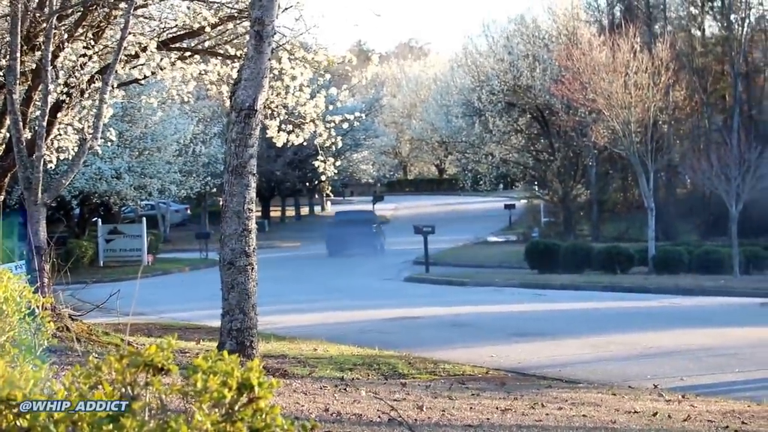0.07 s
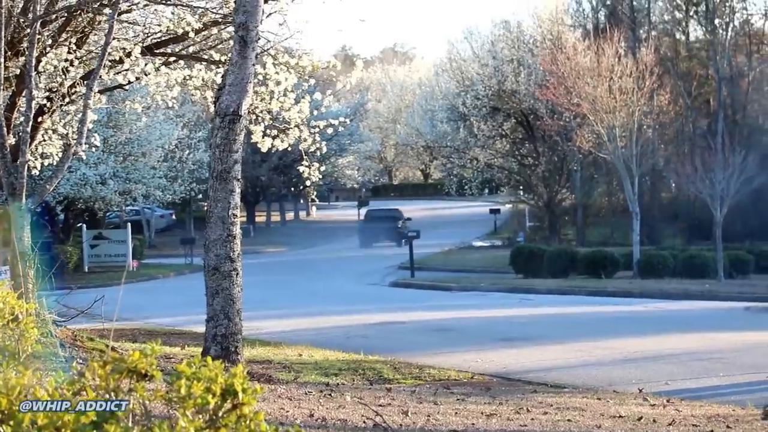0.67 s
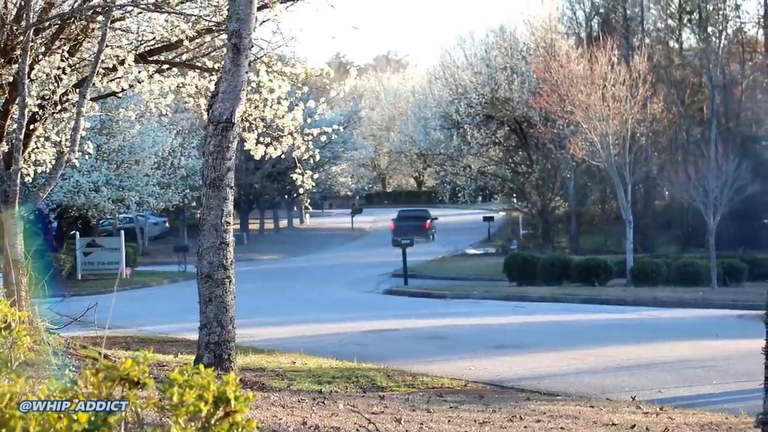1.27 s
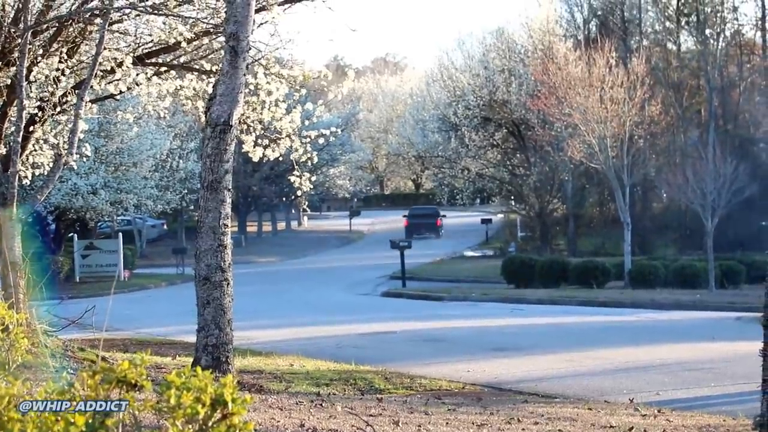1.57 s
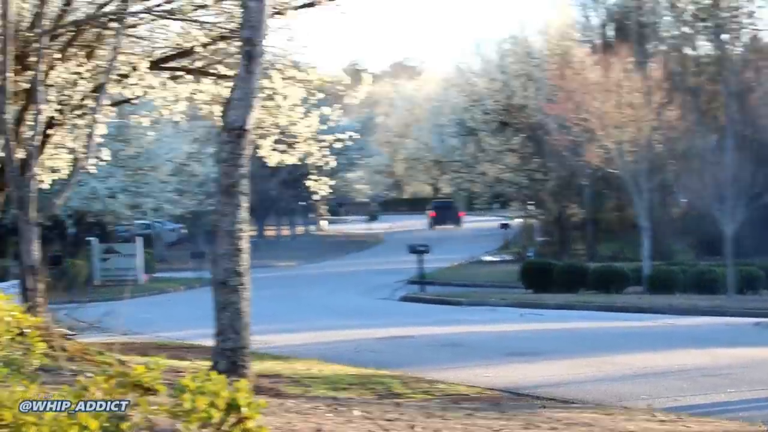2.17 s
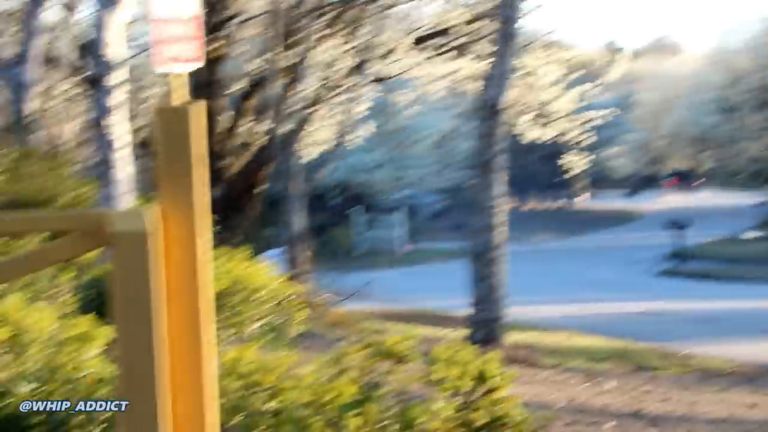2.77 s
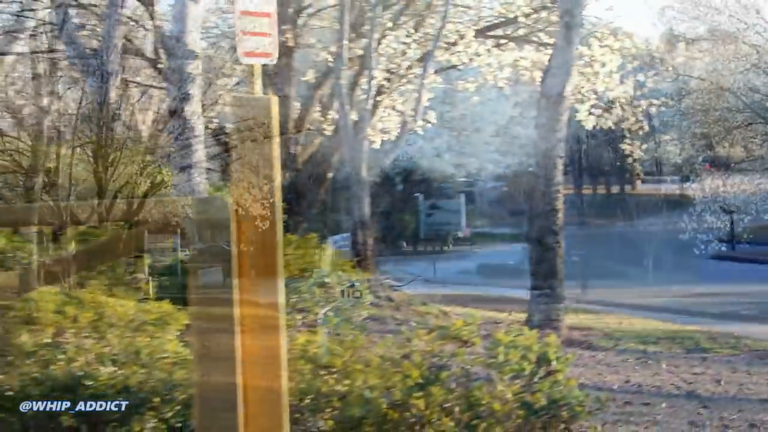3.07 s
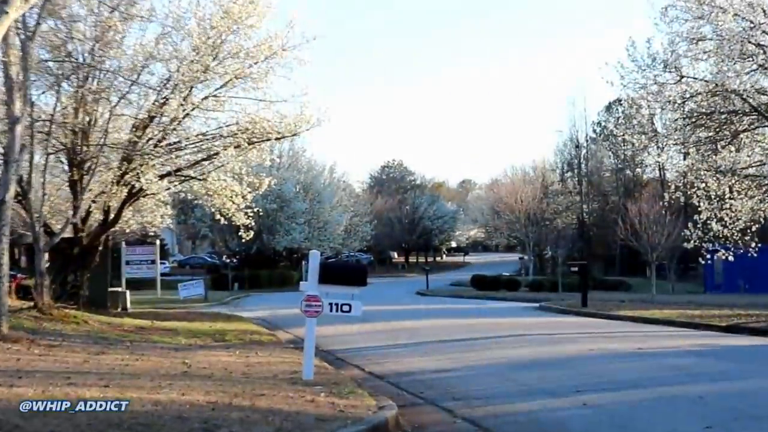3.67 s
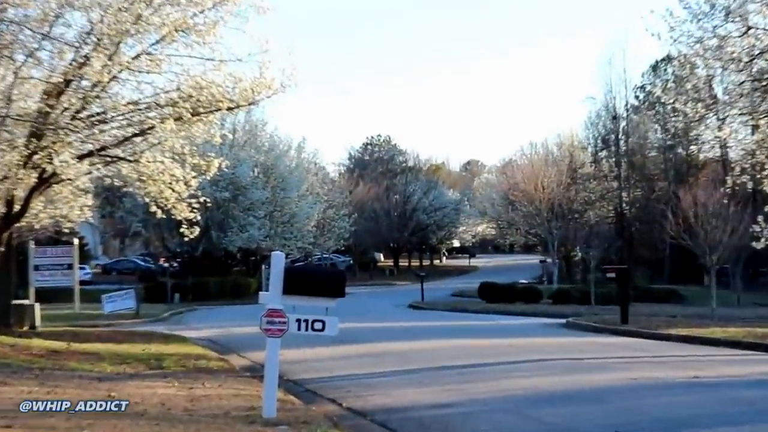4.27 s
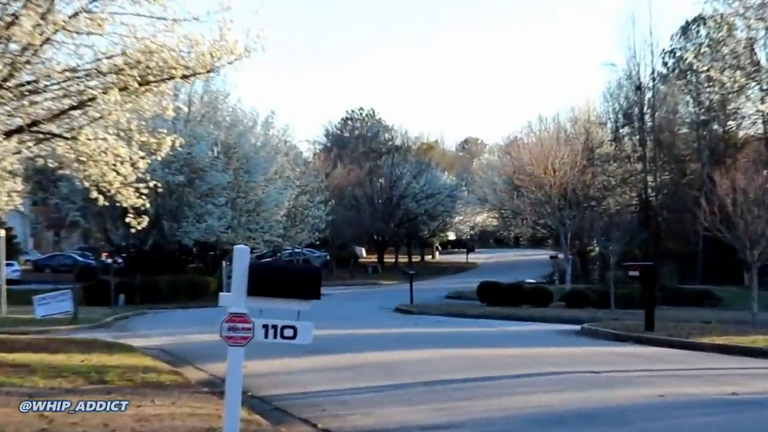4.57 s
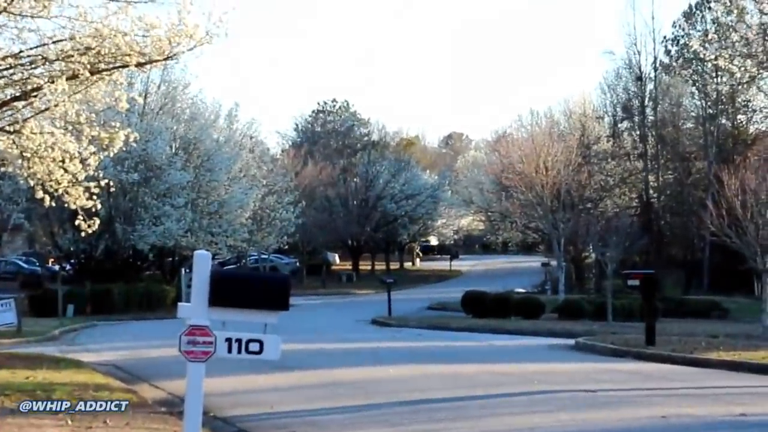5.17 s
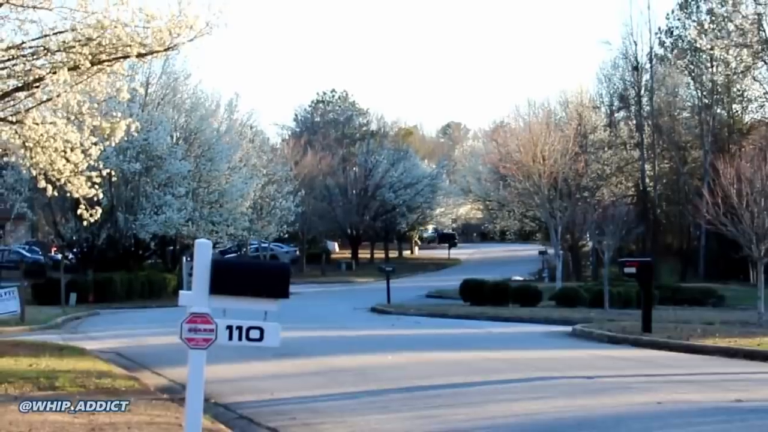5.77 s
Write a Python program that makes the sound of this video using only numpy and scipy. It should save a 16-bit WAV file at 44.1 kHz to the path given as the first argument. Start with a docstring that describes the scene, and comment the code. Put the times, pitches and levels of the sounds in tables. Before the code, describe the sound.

A V8 truck pulls away and fades under gusting wind and snapping twigs, then, in calm air, rumbles softly nearer from far off.

```python
"""A V8 truck pulls away down a street, rasping under load, then eases off and burbles into the distance.
As it goes, a gust rises: it buffets the microphone, roars in the trees and rustles the leaves,
and dry twigs snap. Just after three seconds, a hard cut to calm air and a murmur of traffic.
The truck, far off, rolls slowly nearer just above idle, its exhaust fluttering; one last twig snaps."""
import sys
import numpy as np
from scipy import signal
from scipy.fft import rfft, irfft, next_fast_len
from scipy.io import wavfile
from scipy.ndimage import uniform_filter1d, map_coordinates

SR = 44100
rng = np.random.default_rng(int(sys.argv[2]) if len(sys.argv) > 2 else 0)


def dump(signal):
    """Clip the signal to [-1, 1] and save it as 16-bit WAV at the path in sys.argv[1]."""
    limited = np.clip(np.atleast_2d(signal).T, -1, 1)
    pcm = np.round(limited * 32767).astype(np.int16)
    wavfile.write(sys.argv[1], SR, pcm)


N = 256662
T = np.arange(N) / SR
CUT_S = 3.142  # windy departure before, calm return after


# Throttle moves; voice 0 is pulling, 1 easing, 2 rolling, 3 cruising: start_s, cycle_hz, lag_s, voice
THROTTLE_MOVES = [(0, 42.5, .05, 0), (.27, 43.2, .03, 0), (.465, 30.7, .057, 1), (.87, 26.9, .035, 2),
                  (1.15, 25.4, .045, 2), (1.35, 28.4, .037, 2), (1.6, 22.5, .033, 3), (2.9, 20.6, .07, 3)]
def engine():
    """Cycle rate, voice and roughness: the engine lags behind the throttle and stumbles at each lift."""
    last_hz, last_voice = 42.05, 0
    cycle_hz, voice, lifts = np.full(N, last_hz), np.zeros(N), np.zeros(N)
    for start_s, hz, lag_s, new_voice in THROTTLE_MOVES:
        cycle_hz += (hz - last_hz) * settle(start_s, lag_s)
        voice += (new_voice - last_voice) * settle(start_s, lag_s)
        age = since(start_s) / 0.075  # the stumble peaks 75 ms after the lift
        lifts += (new_voice - last_voice) * age * np.exp(1 - age)
        last_hz, last_voice = hz, new_voice
    roughness = 0.037 + 0.048 * voice + 0.32 * lifts
    return cycle_hz, voice, roughness


# The exhaust's four voices, as harmonics of the cycle rate: order, relative_db
PULLING_ORDERS = [(1, -44.5), (2, -7), (3, -11), (4, -8), (5, 1), (6, -1.5), (7, 1.5), (8, -2), (9, -3),
                  (10, -1.5), (11, -14.5), (12, -17), (13, -16.5), (14, -19), (15, -10), (16, -15),
                  (17, -15.5), (18, -14.5), (19, -7.5), (20, -16), (21, -9.5), (22, -22), (23, -15.5),
                  (24, -11.5), (25, -31.5), (26, -8), (27, -15), (28, -12), (29, -25), (30, -14),
                  (31, -16.5), (32, -21), (33, -27), (34, -41), (35, -14), (36, -36), (37, -34.5),
                  (38, -24), (39, -17.5), (40, -21.5)]
EASING_ORDERS = [(1, -40), (2, -34), (3, -16), (4, -24), (5, -12), (6, -12.5), (7, -14), (8, 1.5), (9, -19),
                 (10, -11.5), (11, -11), (12, -19.5), (13, -30), (14, -22), (15, -19), (16, -21.5),
                 (17, -28), (18, -21), (19, -33), (20, -37), (21, -42), (22, -28), (23, -41), (24, -30),
                 (25, -34), (26, -18.5), (27, -38), (28, -29)]
ROLLING_ORDERS = [(1, -20), (2, -29), (3, -27), (4, -13), (5, -1), (6, -28), (7, -9.5), (8, 3), (9, -15),
                  (10, -12), (11, -13.5), (12, -10.5), (13, -24), (14, -22.5)]
CRUISING_ORDERS = [(1, -26), (2, -21), (3, -23.5), (4, -10), (5, 8), (6, -27.5), (7, 0.5), (8, -11),
                   (9, -2), (10, -7.5), (11, -14), (12, -22), (13, -5.5), (14, -17)]
# Tone of the breathy rasp and of its hard buzz: freq_hz, gain_db
RASP_EQ = [(25, -33), (55, -22), (75, -3), (110, 6), (260, 14.5), (420, 10.5), (560, -12.5), (1000, 7),
           (1600, 2.5), (2200, -1), (3000, 0.5), (4000, -10.5), (6000, -22.5), (8000, -37.5), (14000, -78)]
BUZZ_EQ = [(700, -48), (1000, -14), (1700, 5.5), (2400, -0.5), (3000, -7.5), (4000, -12.5), (6000, -24),
           (9000, -45), (14000, -72)]
# The exhaust booms up: peak_s, note_gain_db, rasp_gain_db, half_length_s
EXHAUST_BOOMS = [(.4, 1, 1, 0.032), (0.623, 3, 0.5, .03), (.815, 8.5, 5, 0.051), (1.402, 7, -9, .11),
                 (2.35, 4.5, 2, 0.086), (2.86, 6, -1, .12)]
def exhaust_leaving(lift_off_s=0.38):
    """Off the throttle the note drops and turns rough, the rasp dies, and distance fades the rest."""
    cycle_hz, voice, roughness = engine()
    boom_db, bark_db = swells(EXHAUST_BOOMS)
    note_db = -16.5 - 8 * settle(lift_off_s, lag_s=0.17) - 0.5 * T + boom_db
    rasp_db = -25.5 - 22 * since(lift_off_s) + bark_db
    stumble = 0.0595 * roughness * wander(rate_hz=28)
    cycles = np.cumsum(cycle_hz) / SR + stumble
    voices = [PULLING_ORDERS, EASING_ORDERS, ROLLING_ORDERS, CRUISING_ORDERS]
    note = exhaust_note(cycles, voices, voice, roughness, flicker_hz=23.97)
    rasp = noise(RASP_EQ, patchy_db=1.5) * puffs(cycles, depth=0.23, lope=0.047)
    # part of the rasp repeats with every engine cycle: a hard buzz
    grain = rng.standard_normal(1024)
    buzz = colour(np.interp(cycles, np.arange(1024) / 1024, grain, period=1), BUZZ_EQ)
    return from_db(note_db) * note + from_db(rasp_db) * (rasp + from_db(-3) * buzz)


# The exhaust's voice near idle: order, relative_db
IDLE_ORDERS = [(1, -35), (2, -35), (3, -37), (4, -34), (5, -7), (6, -13), (7, -40), (8, 1.5), (9, -7),
               (10, -7.5), (11, -13), (12, -12.5), (13, -7.5), (14, -12), (15, -13), (16, -15.5), (17, -21),
               (18, -23), (19, -15), (20, -14.5), (21, -18.5), (22, -19.5), (23, -18.5), (24, -28),
               (25, -44), (26, -15.5), (27, -29), (28, -45)]
# Tone of the idling note, light in the bass, and of the gas flutter: freq_hz, gain_db
IDLE_NOTE_EQ = [(50, -18), (85, -12.5), (125, -2), (215, 2), (500, -7)]
FLUTTER_EQ = [(20, -44), (70, -19), (140, 4), (220, 3), (320, 1.5), (470, 1), (650, -6.5), (1200, -19),
              (3000, -60)]
def exhaust_returning(start_hz=18.05, idle_hz=16.68, settle_s=0.39):
    """A loping note sinks toward idle; it and the flutter of exhaust gas grow as the truck nears."""
    cycle_hz = idle_hz + (start_hz - idle_hz) * np.exp(-since(CUT_S) / settle_s)
    cycles = np.cumsum(cycle_hz) / SR
    nearness = settle(start_s=4.01, lag_s=0.39)
    note_db = np.interp(nearness, [0, 1], [-34.5, -24])
    flutter_db = np.interp(nearness, [0, 1], [-49, -33])
    note = exhaust_note(cycles, [IDLE_ORDERS], np.zeros(N), roughness=0.15, flicker_hz=7)
    flutter = noise(FLUTTER_EQ, patchy_db=0.8) * puffs(cycles, depth=0.092, lope=0.1)
    return from_db(note_db) * colour(note, IDLE_NOTE_EQ) + from_db(flutter_db) * flutter


def exhaust_note(cycles, voices, voice, roughness, flicker_hz):
    """Engine orders, crossfaded between voices; each flickers as firings vary and echoes shift."""
    note, slots = np.zeros(N), np.arange(len(voices))
    for order in range(1, max(map(len, voices)) + 1):
        gains = [from_db(rows[order - 1][1]) if order <= len(rows) else 0 for rows in voices]
        flicker, jitter = roughness * wander(flicker_hz), roughness * wander(flicker_hz)
        phase = 2 * np.pi * (order * cycles + rng.random())
        partial = (1 + flicker) * np.cos(phase) + jitter * np.sin(phase)
        note += np.interp(voice, slots, gains) * partial
    voice_rms = [np.sqrt(sum(from_db(db) ** 2 for _, db in rows) / 2) for rows in voices]
    return note / np.interp(voice, slots, voice_rms) / np.sqrt(1 + 2 * roughness ** 2)


def puffs(cycles, depth, lope):
    """Gas leaves the pipe in eight puffs a cycle, with one bank stronger than the other."""
    phase = 2 * np.pi * cycles
    return unit(np.exp(depth * np.cos(8 * phase) + lope * np.cos(phase)))


# Midrange roar of rubber on the road: freq_hz, gain_db
TYRE_EQ = [(200, -22.5), (500, 4.5), (800, 5), (1200, 5), (1800, -2.5), (2800, -30), (5000, -44),
           (10000, -53.5)]
def tyres_leaving(roll_start_s=0.5):
    """The last of the wheelspin, then a rolling roar that comes up and recedes."""
    spin = from_db(-22.5 - 91.5 * T)
    roll = settle(roll_start_s, lag_s=0.037) * from_db(-29 - 5.5 * since(roll_start_s))
    return (spin + roll) * noise(TYRE_EQ, patchy_db=2)


# Soft wash of a slow roll: freq_hz, gain_db
SLOW_TYRE_EQ = [(20, -16), (60, 7.5), (400, -4), (900, 1.5), (1300, -4), (2000, -10), (3000, -17),
                (4200, -39), (8000, -45)]
def tyres_returning():
    """Tyres on the quiet street creep up in level."""
    return from_db(-44 + 0.5 * since(CUT_S)) * noise(SLOW_TYRE_EQ, patchy_db=1.15)


# Buffeting and deep rumble on the microphone, and the roar in the trees: freq_hz, gain_db
BUFFET_EQ = [(20, -24.5), (60, -14.5), (95, 0), (150, 1), (210, 2), (280, -15), (380, -20.5), (600, -61)]
RUMBLE_EQ = [(8, -11), (25, -4), (50, -7.5), (75, 3.5), (130, -4), (300, -57)]
TREE_EQ = [(100, -6.5), (330, 7), (560, -0.5), (850, 1.5), (1300, -3.5), (2100, -4), (2900, -5.5),
           (3800, -13.5), (5000, -9.5), (9000, -48.5), (15000, -55)]
# Swells and lulls of the gust: peak_s, buffet_gain_db, roar_gain_db, rustle_gain_db, half_length_s
GUST_SWELLS = [(1.12, -2, -1, -3, .07), (1.48, -1, 0, 8.5, 0.073), (1.863, 0, 4, 2, 0.16),
               (2.78, 0, 0.5, 1.8, 0.046), (2.99, 0.5, 0, -3, 0.045), (3.12, -1.5, 2, 2, 0.027)]
# Slow, deep eddies roll over the microphone: peak_s, level_db, half_length_s
ROLLING_EDDIES = [(0.926, -33, 0.038), (1.333, -41, 0.03), (2.003, -29, 0.21), (2.52, -28, 0.2)]
# Strong eddies thump it: peak_s, level_db, pitch_hz, half_length_s
EDDY_THUMPS = [(.96, -15, 128.6, 0.024), (2.903, -6.5, 114, 0.022), (3.135, -7, 133, 0.0047)]
def wind():
    """The gust pushes on the microphone and roars in the trees."""
    buffet_db, roar_db, _ = swells(GUST_SWELLS)
    buffet_gain = gust(before_db=-41, arrival_db=-27.5, growth_db_per_s=2.75) * from_db(buffet_db)
    rumble_gain = gust(before_db=-68.5, arrival_db=-48, growth_db_per_s=5) + surges(ROLLING_EDDIES)
    roar_gain = gust(before_db=-52, arrival_db=-42, growth_db_per_s=4.88) * from_db(roar_db)
    air = buffet_gain * noise(BUFFET_EQ, patchy_db=1)
    air += rumble_gain * noise(RUMBLE_EQ, patchy_db=-0.5)
    air += roar_gain * noise(TREE_EQ, patchy_db=1)
    for peak_s, level_db, pitch_hz, half_length_s in EDDY_THUMPS:
        envelope = from_db(level_db) * np.exp(-((T - peak_s) / half_length_s) ** 2)
        air -= envelope * np.cos(2 * np.pi * pitch_hz * (T - peak_s))
    return air


def gust(before_db, arrival_db, growth_db_per_s, start_s=0.74):
    """Gain of a wind-driven layer: the gust arrives quickly, then goes on building."""
    rise_db = arrival_db - before_db + growth_db_per_s * since(start_s)
    return from_db(before_db + settle(start_s, lag_s=0.035) * rise_db)


# Bright leaves in the trees and crisper ones in the nearest bush: freq_hz, gain_db
LEAF_EQ = [(1500, -17), (3500, -11.5), (4400, -3.5), (5200, 2.5), (6300, 1.5), (7500, -1.5), (8800, -11),
           (10500, -18.5), (13000, -22), (16000, -43)]
BUSH_EQ = [(2500, -29), (5000, -6.5), (7000, 8), (9000, -1), (11300, -7.5), (12500, -19), (15500, -28.5)]
# The bush stirs: peak_s, level_db, half_length_s
BUSH_FLURRIES = [(0.217, -54.5, 0.042), (.395, -54, 0.0047), (0.785, -55, 0.045), (0.946, -49.5, 0.079)]
def leaves():
    """The trees rustle with the gust; the nearest bush stirs in brief flurries."""
    _, _, rustle_db = swells(GUST_SWELLS)
    tree_gain = gust(before_db=-58, arrival_db=-52.5, growth_db_per_s=5.86) * from_db(rustle_db)
    trees = rustle(LEAF_EQ, ticks_per_s=2700, spread_db=1.5, ticks_db=-7.5)
    bush = rustle(BUSH_EQ, ticks_per_s=500, spread_db=3.5, ticks_db=0)
    return tree_gain * trees + surges(BUSH_FLURRIES) * bush


def rustle(eq, ticks_per_s, spread_db, ticks_db):
    """A wash of far leaves and the separate ticks of near ones."""
    sizes = rng.choice([-1, 1], N) * from_db(spread_db * np.minimum(rng.exponential(1, N), 4))
    ticks = (rng.random(N) < ticks_per_s / SR) * sizes
    return unit(noise(eq, patchy_db=2.5) + from_db(ticks_db) * colour(ticks, eq))


# Brittle tone of a snap: freq_hz, gain_db
TWIG_EQ = [(1000, -20), (3500, -2), (5200, 1), (8000, -0.5), (10000, -16), (15500, -28)]
# Single snaps: start_s, peak_db, ring_s
TWIG_SNAPS = [(1.3992, -29.5, 0.04), (1.4564, -31, 0.041), (1.481, -28, 0.043), (1.4954, -41, 0.04),
              (1.537, -32, 0.04), (1.7377, -25, 0.046), (1.742, -24.5, 0.044), (2.4524, -37, 0.034),
              (2.4942, -23, 0.13), (5.474, -31.5, 0.028)]
def twigs(crest_db=10):
    """Dry leaves and twigs snap: bright bursts that fall 60 dB over their ring time."""
    envelope = sum((T >= start_s) * from_db(peak_db - crest_db - 60 * since(start_s) / ring_s)
                   for start_s, peak_db, ring_s in TWIG_SNAPS)
    return envelope * noise(TWIG_EQ, patchy_db=2)


# Low murmur and faint hiss under the calm scene: freq_hz, gain_db
TRAFFIC_EQ = [(15, -38), (45, -28), (68, -7), (95, 1.5), (115, -5.5), (200, -8.5), (500, -51)]
HISS_EQ = [(100, 10.5), (3500, 2), (6000, -1), (9000, -4), (15500, -16)]
def calm_air():
    """A bed of far traffic and the microphone's own hiss."""
    traffic = from_db(-34.5) * noise(TRAFFIC_EQ, patchy_db=1)
    return traffic + from_db(-54.5) * noise(HISS_EQ, patchy_db=1.1)


def noise(eq, patchy_db):
    """Coloured noise with small drifting patches in time and pitch."""
    spectrum = signal.stft(rng.standard_normal(N), nperseg=512)[2]
    patches = uniform_filter1d(rng.standard_normal(spectrum.shape), size=9, axis=0)
    patches = unit(uniform_filter1d(patches, size=10, axis=1))
    mottled = signal.istft(spectrum * from_db(patchy_db * patches), nperseg=512)[1][:N]
    return colour(mottled, eq)


def colour(sound, eq):
    """Shapes a sound with an EQ curve, then scales it to an rms of one."""
    freq_hz, gain_db = np.transpose(eq)
    size = next_fast_len(N)
    bins_hz = np.fft.rfftfreq(size, 1 / SR)
    curve_db = np.interp(np.log(bins_hz + 1), np.log(freq_hz), gain_db)
    return unit(irfft(rfft(sound, size) * from_db(curve_db), size)[:N])


def wander(rate_hz):
    """Smooth random drift of about unit size."""
    coarse_s = T[::128]
    drift = map_coordinates(rng.standard_normal(512), [coarse_s * rate_hz], order=3, mode="wrap")
    return np.interp(T, coarse_s, drift)


def since(start_s):
    """Seconds after the start, zero before it."""
    return np.maximum(T - start_s, 0)


def settle(start_s, lag_s):
    """A smooth rise from 0 to 1, as of something heavy that follows a sudden push."""
    age = since(start_s) / lag_s
    return 1 - (1 + age) * np.exp(-age)


def swell(peak_s, half_length_s):
    """A bell-shaped swell of height one."""
    return np.exp(-0.5 * ((T - peak_s) / half_length_s) ** 2)


def swells(rows):
    """Fader rides in dB, one for each gain column."""
    return sum(np.outer(gains_db, swell(peak_s, half_s)) for peak_s, *gains_db, half_s in rows)


def surges(rows):
    """A gain envelope that swells out of silence once for each row."""
    return sum(from_db(level_db) * swell(peak_s, half_s) for peak_s, level_db, half_s in rows)


def from_db(db):
    """Decibels to gain."""
    return 10 ** (np.asarray(db) / 20)


def unit(sound):
    """Scales to an rms of one."""
    return sound / np.sqrt(np.mean(sound ** 2) + 1e-20)


def scene():
    """The windy departure, cut straight to the calm return; twigs snap in both."""
    cut = np.clip(since(CUT_S) * SR / 64, 0, 1)  # 64-sample crossfade
    departure = exhaust_leaving() + tyres_leaving() + wind() + leaves()
    approach = exhaust_returning() + tyres_returning() + calm_air()
    return ((1 - cut) * departure + cut * approach + twigs())[None]


def record(dry):
    """A steep low-pass trims the very top of the treble."""
    lowpass = signal.firwin(511, 15800, window=("kaiser", 9), fs=SR)
    return signal.oaconvolve(dry, lowpass[None], "same")


dry = scene()
out = record(dry)
dump(out)
```